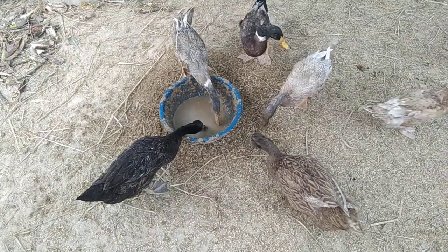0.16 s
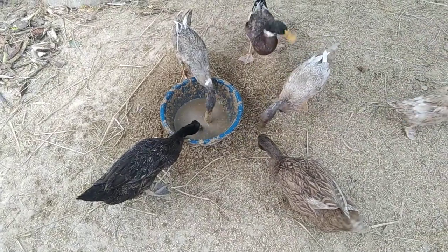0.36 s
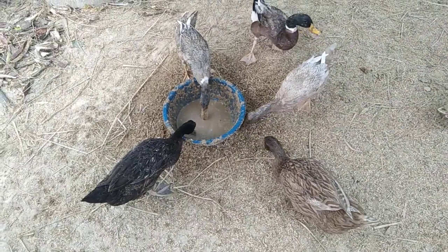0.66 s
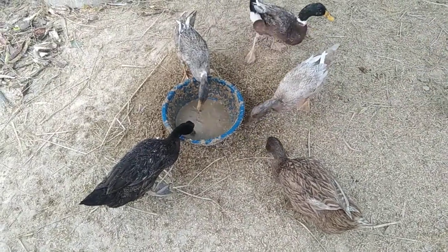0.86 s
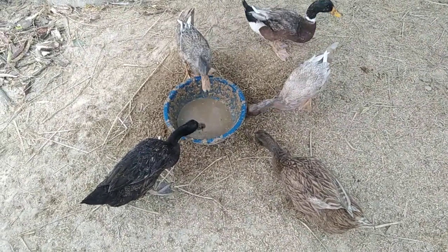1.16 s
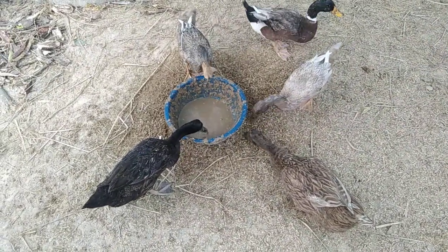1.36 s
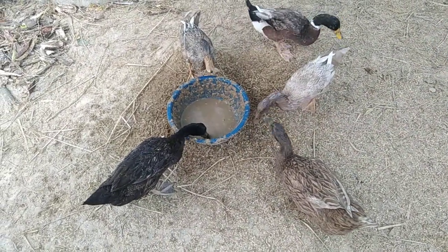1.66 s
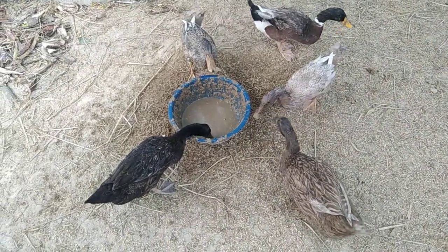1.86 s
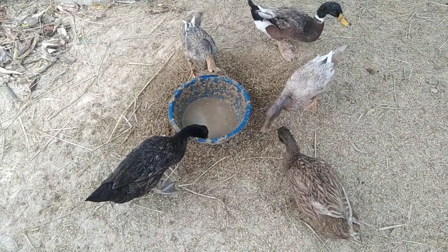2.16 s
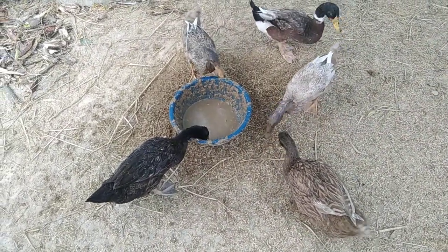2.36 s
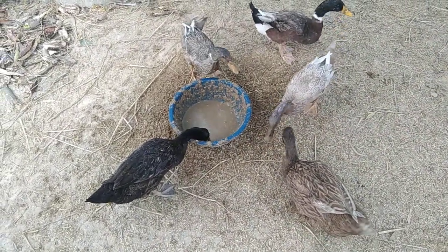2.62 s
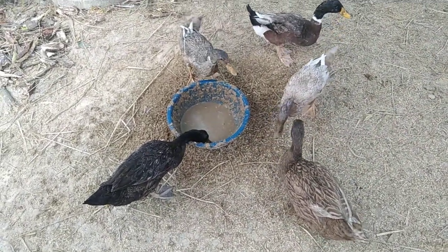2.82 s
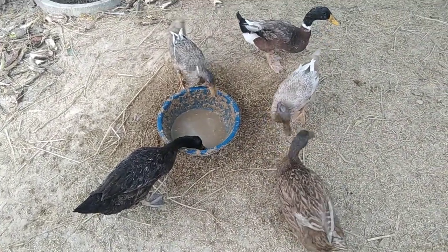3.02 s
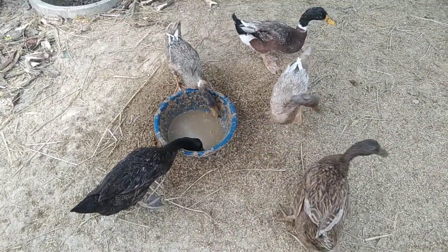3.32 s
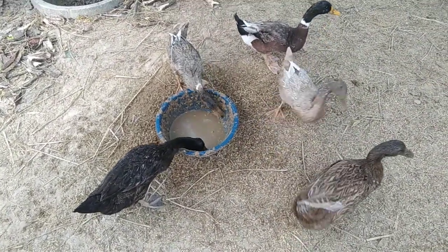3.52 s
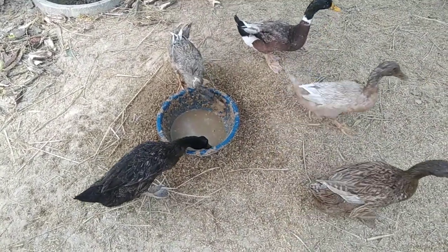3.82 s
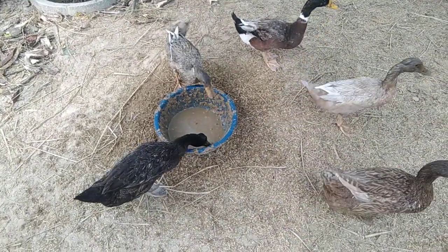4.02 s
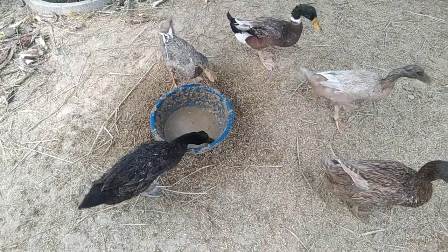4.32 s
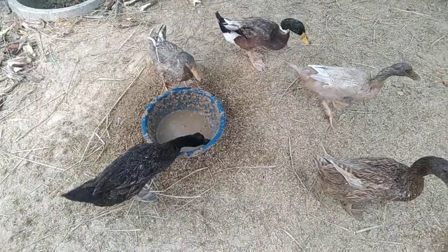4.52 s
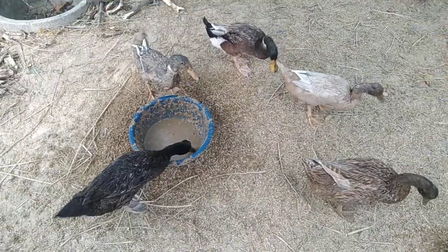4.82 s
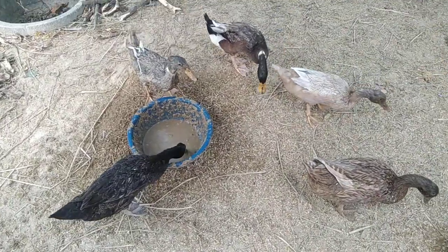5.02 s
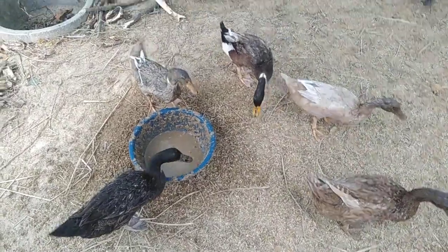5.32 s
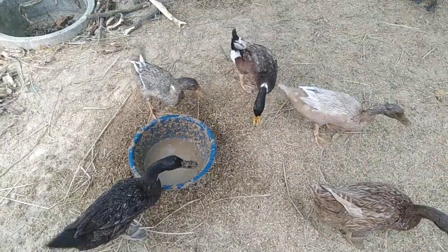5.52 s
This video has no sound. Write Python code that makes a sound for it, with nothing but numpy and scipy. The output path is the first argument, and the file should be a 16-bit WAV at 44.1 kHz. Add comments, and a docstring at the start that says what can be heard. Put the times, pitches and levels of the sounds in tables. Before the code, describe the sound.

Ducks dabble and click their bills in muddy water, giving short quacks, one longer quack and a buzzing chuckle, until a heavy bang startles the yard.

```python
"""Ducks feed at a bowl in a farmyard below a phone: thuds (gusts and hollow puffs that go with quacks) are filtered
noise; bills dabble and click as noise and rising bubbles. Short quacks, then a long one at 0.55 s, are pulse trains
through throat and mouth resonances; a buzzing chuckle follows at 0.9 s. A far moan and far fowl are sums of partials.
At 2.9 s something heavy bangs in close blows of decaying noise, rumbles away and rattles.
The phone's noise suppressor leaves the background in patches."""
import sys
import numpy as np
from scipy import signal
from scipy.fft import rfft, irfft, next_fast_len
from scipy.io import wavfile
from scipy.ndimage import uniform_filter1d, minimum_filter1d, map_coordinates

SR = 44100
rng = np.random.default_rng(int(sys.argv[2]) if len(sys.argv) > 2 else 0)


def generate_wav(sig):
    """Save sig (samples, or channels by samples) to the path in sys.argv[1] as 16-bit PCM at SR."""
    pcm = np.round(np.clip(np.atleast_2d(sig).T, -1, 1) * 32767).astype(np.int16)
    wavfile.write(sys.argv[1], SR, pcm)


N = 250190

# Thuds: gusts on the phone, and hollow puffs that go with quacks:
# [start t/s, length t/s, deep level/dB, hollow level/dB], before the thud envelope
THUD_EVENTS = [(0, 0.11, -77, -58.5), (0.124, 0.35, -82, -57.5), (0.229, 0.094, -78, -52.5),
               (0.327, 0.19, -76, -60.5), (0.444, 0.11, -84, -60), (0.566, 0.48, -61.5, -47.5),
               (1.092, 0.22, -90, -49.5), (1.35, .08, -73, -80), (1.67, 0.21, -67, -64),
               (1.889, 0.33, -77, -54.5), (2.088, 0.14, -70.5, -62.5), (2.199, 0.16, -67, -56),
               (3.115, 0.42, -46, -45.5), (3.394, 0.26, -57, -58.5), (3.803, 0.16, -60, -57),
               (4.211, 0.2, -70, -59), (4.421, 0.17, -74, -60.5), (4.573, 0.18, -68, -73),
               (4.821, 0.28, -50.5, -56), (4.994, .27, -52, -56.5), (5.38, 0.14, -83, -70),
               (5.596, 0.18, -81.5, -70.5)]
# Thud envelope: [share of the length, level/dB]
THUD_ENVELOPE = [(0, -11), (.1, -1), (.6, -8), (1, -21)]
# Spectra of deep rumble and of hollow thud (also the chest puff): [f/Hz, level/dB]
DEEP_SPECTRUM = [(29, -40.5), (50, -6.5), (97, -0.5), (134, -1.5), (260, -6.5), (340, -28), (570, -120)]
HOLLOW_SPECTRUM = [(130, -30), (220, -4.5), (448, -9), (566, -15.5), (700, -32), (910, -60.5), (1540, -120)]
BREEZE_DB = -80  # steady deep rumble under the thuds

# Level courses of far flock and dabbling, in successive segments: [t/s, level/dB]
FLOCK_COURSE = [
    [(0.0, -54), (0.13, -70), (0.298, -57.5), (0.55, -102.5)],
    [(0.9, -48.5), (1.042, -63), (1.372, -71), (1.518, -88), (1.726, -66), (1.862, -55), (1.9, -59)],
    [(1.9, -46), (1.966, -48.5), (2.266, -54), (2.404, -76), (2.654, -66), (2.82, -52.5), (2.89, -51)],
    [(3.2, -44.5), (3.44, -47.5), (3.62, -55.5), (3.854, -59.5), (4.068, -58), (4.286, -57.5), (4.4, -60)],
    [(4.4, -67), (4.48, -58), (4.628, -52.5), (4.802, -59), (4.94, -66), (5.45, -77.5), (5.67, -90.5)],
]
DABBLE_COURSE = [
    [(0.0, -58.5), (0.5, -60.5), (0.55, -53.5)],
    [(0.9, -45.5), (1.008, -47.5), (1.238, -54), (1.364, -53), (1.526, -62.5), (1.716, -62), (1.9, -54)],
    [(1.9, -56), (2.288, -50.5), (2.494, -56.5), (2.604, -59), (2.762, -55.5), (2.89, -47.5)],
    [(3.2, -55.5), (3.44, -52), (3.596, -68.5), (3.844, -75), (3.974, -62), (4.044, -58), (4.4, -63)],
    [(4.4, -60), (4.658, -55.5), (4.782, -60), (4.934, -66), (5.156, -71), (5.302, -68), (5.67, -60.5)],
]
# Puffs of spray: [crest t/s, level/dB]
SPRAY_PUFFS = [(0.388, -79), (.96, -58.5), (1.1, -63.5), (2.05, -84), (2.214, -63), (2.519, -78),
               (2.78, -82.5), (3.35, -89), (3.52, -73.5), (3.84, -70.5), (4.131, -67.5), (4.47, -63.5),
               (4.58, -67.5), (5.6, -87)]
# Spectra of flock, dabbling, spray, and a low hum with a little hiss: [f/Hz, level/dB]
FLOCK_SPECTRUM = [(410, -67), (700, -24.5), (914, -1), (1090, -1.5), (1210, 0), (1540, -0.5), (2130, -8),
                  (2500, -9), (3250, -23.5), (5500, -120)]
DABBLE_SPECTRUM = [(1350, -32), (2300, -7), (3500, -5.5), (5380, -10), (5660, -11), (6150, -17),
                   (7070, -37), (7500, -24.5), (9750, -46), (16500, -120)]
SPRAY_SPECTRUM = [(4120, -32.5), (7000, 0.5), (8380, 8.5), (9180, -1), (13300, 0.5), (15600, -4)]
HUM_SPECTRUM = [(12, -45), (20, -18), (81, 23.5), (650, -19), (960, -6), (3560, -22.5), (5400, 9),
                (7130, -34.5), (15600, -50)]
SPRAY_DB, HUM_DB = -26.5, -99.5  # spray relative to the dabbling; hum rms
PUFF_RISE_S, PUFF_FALL_S = 0.02, 0.045

# Bill clicks and slurps: [t/s, overall level/dB, bubble start f/Hz, then relative levels/dB of
# knock, spray and bubble]; knock and spray are weighted again in bills()
BILL_CLICKS = [(0.0354, -58.5, 2050, 21.5, -13, -6), (0.0918, -50, 3540, 8.5, -49, 15.5),
               (0.1517, -40, 3450, -28, -26, -15), (0.452, -60, 2770, 10, -57, -19),
               (0.4768, -55, 4800, -28, -48, 7), (0.5184, -54.5, 2220, 17, -5, 12.5),
               (0.9629, -39, 3280, 9.5, -7, 0), (1.584, -56.5, 5070, -43, -51, 10.5),
               (1.6948, -34.5, 3260, -1, -23.5, -0.5), (1.862, -48.5, 2280, -27, -8.5, -14),
               (2.081, -37, 3550, 6.5, -28, -14), (2.1216, -43, 2160, 2, -33, 4.5),
               (2.174, -31, 3300, -13, -41, -28), (2.3157, -40, 2020, 0, -27, -4),
               (2.3394, -29, 2106, -17, -52, -15), (2.394, -42, 4030, 3.5, -39, -2.5),
               (2.4184, -42.5, 2600, 1, -26, -1), (2.4678, -33.5, 3630, -56, -14.5, -4.5),
               (2.5634, -42, 4070, 1.5, -54, 1.5), (2.597, -42.5, 2480, -14.5, -27, -5),
               (2.6572, -40.5, 3970, -26.5, -15, -3), (2.7186, -44.5, 3740, -13.5, -31, 9),
               (2.8429, -61.5, 3490, -19, -48.5, -20.5), (3.4357, -47, 2047, 11, -40, 2),
               (3.7948, -41, 2410, -28, -20.5, -17.5), (3.9103, -35.5, 2980, -17.5, -28, -12),
               (3.9577, -39, 2900, 1, -36.5, -11), (4.1802, -43, 2900, -13, -15, -28.5),
               (4.2892, -43.5, 2030, 6.5, -15, -27), (4.451, -33.5, 3900, 2, -17, -5),
               (4.4859, -28, 3330, -8.5, -22.5, -10), (4.5434, -45, 4840, 10, -31, 1.5),
               (4.8235, -43.5, 3300, 6, -41, -9)]

# Short quacks: [start t/s, length t/s, crest as share of length, crest level/dB, first f/Hz, last f/Hz,
# fundamental level/dB and rasp level/dB relative to the voice, mouth resonance f/Hz]
SHORT_QUACKS = [(.168, 0.061, 0.37, -47.5, 223, 214.7, 2.5, -9, 972),
                (0.233, 0.072, 0.38, -43.5, 248.4, 283, -6, -13.5, 1380),
                (1.67, 0.052, 0.38, -42.5, 273, 262.4, -9.5, -32, 1380),
                (2.012, 0.051, 0.43, -36.5, 292.7, 264.7, -13, -14, 1350),
                (2.231, 0.05, .45, -43.5, 300, 304, -6, -28, 1170),
                (3.393, 0.067, 0.57, -42, 186, 184, -12, -12, 1380),
                (3.537, .055, 0.38, -36, 227.4, 255.3, -12, -15.5, 1323),
                (3.811, .09, 0.3, -33.5, 222.8, 270.5, -17.5, -10, 1355),
                (4.209, 0.076, 0.4, -34, 289.7, 257, -14.5, -13.5, 1353),
                (4.423, 0.061, 0.72, -44, 200.1, 191.2, -19, -12, 1290),
                (4.578, 0.038, 0.53, -44, 305, 283, -11.5, 1.5, 1250),
                (4.697, 0.078, .6, -35.5, 217.9, 212.6, -11, -2, 1330),
                (5.576, 0.074, 0.7, -54, 238.7, 237.7, -40, 0, 1450)]
# Spectra of the short quacks' voice and rasp: [f/Hz, level/dB]
SHORT_THROAT_SPECTRUM = [(260, -74), (450, -20), (736, -0.5), (1350, 2), (1700, 4), (2020, 8), (2300, -51),
                         (2990, -29), (5060, -120)]
RASP_SPECTRUM = [(1240, -27.5), (2100, -10), (3810, -17.5), (4410, -21.5), (4990, -18.5), (7060, -33),
                 (11000, -83), (14300, -112), (22000, -120)]
ONSET_SHARE, START_DB, ONSET_DB, END_DB = 0.079, -12.5, -9.5, -21.5  # short rise, climb to crest, fall
BILL_CLOSES, CHEST_DB = 0.048, -18  # fall of mouth resonance as a share; hollow puff from the chest
# Long quack: [t/s, pitch f/Hz, level/dB, mouth resonance f/Hz, weakening of every other pulse 0-1]
LONG_QUACK = [(0.545, 280, -50, 860, 0.4), (0.566, 266, -44, 880, 0.7), (0.59, 249.7, -45, 910, 1),
              (0.625, 276.1, -52, 1030, .8), (0.656, 236.2, -32.5, 1280, .7), (0.72, 251.4, -29, 1710, 0),
              (0.77, 259.7, -29.5, 1680, 0.7), (0.8, 252, -29.5, 1690, 0.8), (0.85, 232.1, -32, 1660, 0.7),
              (0.866, 260, -55, 1630, .5), (0.9, 259.1, -79, 1600, .4)]
# Throat spectrum of the long quack: [f/Hz, level/dB]
LONG_THROAT_SPECTRUM = [(180, -43), (300, -8), (482, 0.5), (738, 0), (869, 8.5), (1700, 3), (2100, 2.5),
                        (2440, 3.5), (3610, -9), (4320, -4), (5260, -6), (7670, -24), (15000, -38.5)]
LONG_LOW_DB = -16.5  # mean level of the fundamental relative to the voice

# Short single tones; the second is the rising tone that opens the long quack, the others are short whistles:
# [start t/s, length t/s, first f/Hz, last f/Hz, level/dB before the call envelope]
SINGLE_TONES = [(.51, 0.16, 1785, 1740, -57.5), (.548, .07, 820, 1078, -49.5), (2.64, 0.09, 895, 1250, -56),
                (2.718, 0.084, 937, 870, -55), (3.94, 0.071, 1540, 1640, -56.5)]
# Falling tones that end two loud short quacks: columns as the single tones
GULP_TONES = [(3.864, 0.0275, 1145, 760, -50), (4.269, .026, 1418, 798, -43.5)]
# Far hen, honk, duck's whine, hoarse croaks, and a wheezy far chuckle, perhaps the drake: columns as above
HEN_CALLS = [(1.8, 0.1, 555, 564, -46.5), (1.885, 0.083, 544, 590, -55.5), (5.08, 0.046, 484, 480, -66.5)]
HONKS = [(2.7, 0.43, 572.7, 622, -53.5)]
WHINES = [(4.02, 0.1, 298, 243.7, -56.5), (4.105, 0.13, 261.5, 253.6, -56)]
CROAKS = [(4.625, 0.058, 200, 197.6, -54), (4.885, 0.093, 195.3, 202.5, -54.5)]
FAR_CHUCKLES = [(5.115, 0.495, 457, 455, -60)]
# Partials of each far call: [multiple of the pitch, relative level/dB]
HEN_PARTIALS = [(1, -12), (2, 11), (3, 15), (4, 7.5), (5, 0), (6, -20), (7, 1), (8, 1.5)]
HONK_PARTIALS = [(2, 0), (3, -3), (4, -2), (5, -10), (6, -8), (7, -10)]
WHINE_PARTIALS = [(4, -4), (5, -2), (6, 0), (7, -6), (10, -8), (11, -8)]
CROAK_PARTIALS = [(10, -10), (11, -4), (12, 0), (13, 0), (14, 0), (15, -2), (16, -6), (17, -12)]
FAR_CHUCKLE_PARTIALS = [(1, -18), (2, -14.5), (3, -21), (4, -9.5), (5, -7), (6, -1.5), (7, 3), (8, -4),
                        (9, -4), (10, -7), (11, -14.5)]
# Envelope shared by the tones and far calls: [share of the length, level/dB]
CALL_ENVELOPE = [(0, -6), (.15, 4.5), (.85, -1.5), (1, -32.5)]
CALL_ARCH = 0.012  # lift midway through a call, as a share of its first pitch
# Low moan far off: [t/s, pitch f/Hz, second partial level/dB, third partial level/dB]
MOAN_COURSE = [(1.7, 167.7, -70, -82), (1.78, 197.6, -66.5, -69), (1.95, 202.2, -61.5, -60.5),
               (2.09, 217, -65.5, -58.5), (2.15, 198.4, -89, -56.5), (2.2, 177, -90, -67)]

# Feeding chuckle, one row a syllable: [crest t/s, crest level/dB, crest pitch f/Hz]
CHUCKLE_CRESTS = [(0.939, -41, 487.3), (1.019, -41.5, 486.2), (1.107, -41, 475.2), (1.196, -43.5, 467),
                  (1.277, -46, 473.6), (1.365, -47, 444.7), (1.462, -52, 424)]
# Throat spectrum of the chuckle: [f/Hz, level/dB]
CHUCKLE_SPECTRUM = [(710, -29), (1200, -7), (1830, 1.5), (2620, 1), (2980, 1), (3270, -1.5), (4310, 5),
                    (5920, 0), (7160, -11.5), (10700, -33.5), (15000, -36)]
CHUCKLE_START_S, CHUCKLE_END_S = 0.89, 1.63
SWELL_DB_PER_S, DROP_DB_PER_S, TRAIL_DB_PER_S = 151, 447.5, 120.5  # slow swell, fast drop, last decay
EFFORT_HZ_PER_DB = 4  # pitch rises with effort towards each crest

# Blows of the bang: [t/s, nominal level/dB before a 14 dB cut]
BANG_BLOWS = [(2.911, -10.5), (2.954, -9), (2.967, -13)]
# Spectrum of the bang: [f/Hz, level/dB]
BANG_SPECTRUM = [(29, -57.5), (50, -32.5), (98, -7), (195, -2), (230, -4), (408, -7.5), (483, -11),
                 (778, -14), (856, -15), (987, -17), (1590, -18.5), (2500, -22.5), (15000, -65)]
# Reverberation times of the bang: [f/Hz, t60 t/s]
BANG_DECAYS = [(60, 1.3), (170, 0.29), (500, 0.83), (1500, 0.62), (4000, 0.24), (10000, 0.78)]
# Loose parts rattling after the blows: [t/s, level/dB, t60 t/s]
RATTLE_PUFFS = [(2.963, -32, 0.5), (3.022, -26.5, 0.08), (3.087, -45.5, 0.06), (3.128, -58.5, 0.22)]
# Spectrum of the rattle: [f/Hz, level/dB]
RATTLE_SPECTRUM = [(880, -28), (1500, -20), (2550, -0.5), (2920, -4), (4680, -13), (15000, -52)]

ECHO_DECAYS = [(300, 0.27), (2000, 0.21), (8000, 0.079)]  # echo of the near ducks: [f/Hz, t60 t/s]
TOP_HZ = 15730  # band limit of the phone


def amp(db):
    """Amplitude ratio: 20 dB are a factor of ten."""
    return 10 ** (np.asarray(db) / 20)


def unit(x):
    """Normalisation to an rms of 1."""
    return x / np.sqrt(np.mean(x ** 2) + 1e-20)


def along(points, hz):
    """Interpolation of (f/Hz, value) points on a logarithmic frequency axis."""
    f, v = np.transpose(points)
    return np.interp(np.log(hz + 1), np.log(f + 1), v)


def filtered(x, response):
    """Linear filtering: the spectrum is multiplied by a response of frequency."""
    m = next_fast_len(x.shape[-1] + 8192)
    spectrum = rfft(x, m) * response(np.fft.rfftfreq(m, 1 / SR))
    return irfft(spectrum, m)[..., :x.shape[-1]]


def colour(x, spectrum):
    """Spectral shaping by (f/Hz, level/dB) points, to rms 1."""
    return unit(filtered(x, lambda hz: amp(along(spectrum, hz))))


def span(rows):
    """Piecewise linear courses: start sample, a fade at both ends, one value per sample for each column."""
    s, *cols = np.transpose(rows)
    t = np.arange(round(s[0] * SR), min(N, round(s[-1] * SR))) / SR
    fade = np.clip(np.minimum(t - t[0], t[-1] - t) / 0.0013, 0, 1)
    return round(s[0] * SR), fade, [np.interp(t, s, c) for c in cols]


def call(start, length, shape):
    """Envelope over relative time: start sample, progress 0-1 and gain."""
    u = np.linspace(0, 1, round(length * SR))
    edge = np.clip(np.minimum(u, 1 - u) * length / 0.004, 0, 1)
    return round(start * SR), u, edge * amp(np.interp(u, *np.transpose(shape)))


def levels(tables):
    """Level courses linear in dB, as one gain per sample for each column."""
    s, *cols = np.concatenate(tables).T
    return [amp(np.interp(np.arange(N) / SR, s, db)) for db in cols]


def add(out, start, x):
    """Superposition: x is mixed into out."""
    out[start:start + len(x)] += x[:len(out) - start]


def wobble(n, rate):
    """Slow random modulation: a smooth curve with rate random knots a second."""
    knots = rng.standard_normal(int(n * rate / SR) + 4)
    return map_coordinates(knots, [np.arange(n) * rate / SR])


def patches(spectrum, patchy_db, grains, width, length):
    """Random modulation in time and frequency: noise with spiky grains and patches of random gain."""
    x = rng.standard_normal(N) * amp(grains * wobble(N, 300))
    z = signal.stft(x, nperseg=512)[2]
    field = uniform_filter1d(rng.standard_normal(z.shape), size=width, axis=0)
    field = uniform_filter1d(field, size=length, axis=1)
    patchy = signal.istft(z * amp(patchy_db * unit(field)), nperseg=512)[1][:N]
    return colour(patchy, spectrum)


def tail(decays, length):
    """Reverberant decay: noise whose every frequency dies at its own speed."""
    hz, t, z = signal.stft(rng.standard_normal(int(length * SR)), SR, nperseg=256)
    return signal.istft(z * amp(-60 * t / along(decays, hz)[:, None]), SR, nperseg=256)[1]


def syrinx(hz, rough, sub, jitter):
    """Pulsed voice source: alternately strong and weak pulses, with noise gated once a cycle."""
    n = len(hz)
    phase = 2 * np.pi * np.cumsum(hz * (1 + jitter * wobble(n, 151.4))) / SR
    k = np.arange(1, int(15000 / hz.max()))[:, None]
    pulses = np.cos(k * phase - 0.3 * k ** 2).sum(0)  # equal harmonics, the higher the later
    alternation = 1 + sub * np.cos(phase / 2)
    pulses = unit(pulses * alternation * amp(1.5 * wobble(n, 120)))
    breath = unit((1 + np.cos(phase)) ** 2 * rng.standard_normal(n))
    return phase, np.sqrt(1 - rough) * pulses + np.sqrt(rough) * breath


def mouth(x, centre_hz, width_hz, lift_db):
    """Moving resonance: a peak in the response follows the opening of the bill."""
    hz, t, z = signal.stft(x, SR, nperseg=256, noverlap=224)
    centre = np.interp(t * SR, np.arange(len(x)), centre_hz)
    gain = amp(lift_db / (1 + ((hz[:, None] - centre) / width_hz) ** 2))
    gain = gain / np.linalg.norm(gain[:16], axis=0)  # offsets the overall lift as the peak moves
    return unit(signal.istft(z * gain, SR, nperseg=256, noverlap=224)[1][:len(x)])


def thuds():
    """Low-frequency noise bursts: each thud lands quickly and dies away as a deep and a hollow rumble."""
    deep, hollow = np.full(N, amp(BREEZE_DB)), np.zeros(N)
    for s, length, deep_db, hollow_db in THUD_EVENTS:
        start, _, gain = call(s, length, THUD_ENVELOPE)
        add(deep, start, amp(deep_db) * gain)
        add(hollow, start, amp(hollow_db) * gain)
    rumble = deep * patches(DEEP_SPECTRUM, 3, 2, width=1, length=8)
    return rumble + hollow * patches(HOLLOW_SPECTRUM, 3, 2, width=1, length=8)


def yard():
    """Small sources merge into noise: far flock, bills sieving mud, spray, a faint steady low hum with a little hiss."""
    (flock,), (dabble,) = levels(FLOCK_COURSE), levels(DABBLE_COURSE)
    t = np.arange(N) / SR
    spray = amp(SPRAY_DB) * dabble
    for s, db in SPRAY_PUFFS:
        width = np.where(t < s, PUFF_RISE_S, PUFF_FALL_S)
        spray = spray + amp(db) * np.exp(-((t - s) / width) ** 2)
    voices = flock * amp(1.5 * wobble(N, 14)) * patches(FLOCK_SPECTRUM, 3, 1.5, width=2, length=14)
    mud = dabble * amp(2 * wobble(N, 22)) * patches(DABBLE_SPECTRUM, 3.5, 2.5, width=3, length=12)
    mist = spray * amp(2.5 * wobble(N, 25)) * patches(SPRAY_SPECTRUM, 4, 2.5, width=3, length=10)
    hum = amp(HUM_DB) * colour(rng.standard_normal(N), HUM_SPECTRUM)
    return voices + mud + mist + hum


def bills():
    """Bubble resonance and turbulence: a rising bubble, a wet splash, a dull knock and a puff of spray."""
    out, t = np.zeros(N), np.arange(SR // 5) / SR

    def band(lo, hi):
        """Band-limited noise between two cutoff frequencies."""
        noise = rng.standard_normal(len(t))
        return unit(filtered(noise, lambda f: 1 / (1 + (lo / (f + 1)) ** 8) / (1 + (f / hi) ** 8)))

    rise = 1 - np.exp(-t / 0.001)
    decay = amp(-60 * t / 0.11) + 0.7 * amp(-60 * t / 0.018)
    for s, db, hz, knock_db, spray_db, bubble_db in BILL_CLICKS:
        bubble = amp(bubble_db - 60 * t / 0.04) * np.sin(2 * np.pi * hz * t * (1 + 3 * t))
        splash = band(hz / 1.5, 1.69 * hz)
        knock = amp(knock_db) * band(850, 2000)
        spray = 2.74 * amp(spray_db) * band(5200, 10000)
        add(out, round(s * SR), amp(db) * rise * (bubble + 0.21 * (splash + knock + spray) * decay))
    return out


def short_quacks():
    """Source and filter: pulses through throat and mouth, with fundamental, rasp and chest puff."""
    out = np.zeros(N)
    for s, length, crest, db, first_hz, last_hz, low_db, rasp_db, mouth_hz in SHORT_QUACKS:
        shape = [(0, START_DB), (ONSET_SHARE, ONSET_DB), (crest, 0), (1, END_DB)]
        start, u, gain = call(s, length, shape)
        pitch = first_hz + (last_hz - first_hz) * u
        breaking = np.clip(np.linspace(0, 1.8, len(u)), 0, 0.8)  # every other pulse weakens progressively
        phase, voice = syrinx(pitch, rough=0.12, sub=breaking, jitter=0.02)
        closing_hz = mouth_hz * (1 - BILL_CLOSES * u ** 4)
        voice = mouth(colour(voice, SHORT_THROAT_SPECTRUM), closing_hz, width_hz=770, lift_db=47.0)
        low = amp(low_db) * np.cos(phase)
        rasp = colour(syrinx(pitch, rough=0.6, sub=breaking, jitter=0.02)[1], RASP_SPECTRUM)
        chest = colour(rng.standard_normal(len(u)), HOLLOW_SPECTRUM)
        add(out, start, gain * amp(db) * (voice + low + amp(rasp_db) * rasp + amp(CHEST_DB) * chest))
    return out


def tones_and_far_calls():
    """Sums of harmonics fluttering in strength: single tones (whistles, quack onset, gulps) and distant calls."""
    out = np.zeros(N)
    sources = [  # calls, partials, flutter of each partial in dB
        (SINGLE_TONES + GULP_TONES, [(1, 0)], 3.5),
        (HEN_CALLS, HEN_PARTIALS, 3.5),
        (HONKS, HONK_PARTIALS, 5),
        (WHINES, WHINE_PARTIALS, 4),
        (CROAKS, CROAK_PARTIALS, 7),
        (FAR_CHUCKLES, FAR_CHUCKLE_PARTIALS, 4.5),
    ]
    for rows, partials, flutter_db in sources:
        for s, length, first_hz, last_hz, db in rows:
            start, u, gain = call(s, length, CALL_ENVELOPE)
            hz = first_hz + (last_hz - first_hz) * u + CALL_ARCH * first_hz * np.sin(np.pi * u)
            jitter = 0.011 * wobble(len(u), 200) + 0.007 * wobble(len(u), 30)
            phase = 2 * np.pi * np.cumsum(hz * (1 + jitter)) / SR
            tone = sum(amp(g + flutter_db * wobble(len(u), 110)) * np.sin(k * phase) for k, g in partials)
            add(out, start, gain * amp(db) * unit(tone))
    return out


def long_quack():
    """Source and filter: pulses through throat and moving mouth resonance, over a soft fundamental."""
    out = np.zeros(N)
    start, fade, (hz, db, mouth_hz, sub) = span(LONG_QUACK)
    phase, voice = syrinx(hz, rough=0.26, sub=np.clip(sub, 0, 1), jitter=0.013)
    voice = mouth(colour(voice, LONG_THROAT_SPECTRUM), mouth_hz, width_hz=300, lift_db=13)
    low = amp(LONG_LOW_DB + 1.8 * wobble(len(hz), 36)) * np.cos(phase)
    add(out, start, fade * amp(db) * (voice + low))
    return out


def chuckle():
    """Amplitude modulation: a bright buzz swells slowly and drops fast in quick syllables."""
    t = np.arange(round(CHUCKLE_START_S * SR), round(CHUCKLE_END_S * SR)) / SR
    s, crest_db, crest_hz = np.transpose(CHUCKLE_CRESTS)[..., None]
    under_db = np.where(t < s, SWELL_DB_PER_S * (s - t), DROP_DB_PER_S * (t - s))
    under_db[-1] = np.where(t < s[-1], under_db[-1], TRAIL_DB_PER_S * (t - s[-1]))  # the last trails off
    hz = np.interp(t, s[:, 0], crest_hz[:, 0]) - EFFORT_HZ_PER_DB * under_db.min(0)
    voice = syrinx(hz, rough=0.38, sub=0, jitter=0.01)[1]
    fade = np.clip(np.minimum(t - t[0], t[-1] - t) / 0.06, 0, 1)
    gain = fade * amp((crest_db - under_db).max(0))
    out = np.zeros(N)
    add(out, round(t[0] * SR), gain * colour(voice, CHUCKLE_SPECTRUM))
    return out


def moan():
    """Harmonics without their fundamental: the second and third partials glide together."""
    out = np.zeros(N)
    start, fade, (hz, second_db, third_db) = span(MOAN_COURSE)
    phase = 2 * np.pi * np.cumsum(hz * (1 + 0.012 * wobble(len(hz), 41))) / SR
    second, third = (amp(3 * wobble(len(hz), 35)) * np.sin(k * phase) for k in (2, 3))
    add(out, start, np.sqrt(2) * fade * (amp(second_db) * second + amp(third_db) * third))
    return out


def bang():
    """Impact and reverberation: each blow is a burst that rumbles round the yard, the deepest bass longest."""
    out = np.zeros(N)
    for s, db in BANG_BLOWS:
        rumble = tail(BANG_DECAYS, 2.1)
        t = np.arange(len(rumble)) / SR
        add(out, round(s * SR), amp(db - 14.0) * rumble * (0.75 + amp(-60 * t / 0.42)))
    level = np.sqrt(np.mean(out ** 2))
    rise = np.clip((np.arange(N) / SR - BANG_BLOWS[0][0]) / 0.002, 0, 1) ** 2  # sharp first onset
    return level * rise * colour(out, BANG_SPECTRUM)


def rattle():
    """Exponential decay of loose parts: soft-edged bright puffs of clatter."""
    out, t = np.zeros(N), np.arange(SR // 3) / SR
    for s, db, t60 in RATTLE_PUFFS:
        clatter = colour(rng.standard_normal(len(t)), RATTLE_SPECTRUM)
        add(out, round(s * SR), amp(db - 60 * t / t60) * (1 - np.exp(-t / 0.005)) * clatter)
    return out


def scene():
    """Superposition of all sources, with a short echo by convolution for the near ducks."""
    ducks = bills() + short_quacks() + long_quack() + chuckle()
    echo = tail(ECHO_DECAYS, 0.18)
    wet = amp(-9) * signal.fftconvolve(ducks, echo / np.linalg.norm(echo))[:N]
    return (thuds() + yard() + ducks + wet + tones_and_far_calls() + moan() + bang() + rattle())[None]


def record(dry):
    """Spectral subtraction: what stands little above the quietest level nearby in time is turned down."""
    z = signal.stft(dry, nperseg=1024, noverlap=768)[2]
    power = uniform_filter1d(np.abs(z) ** 2, size=7, axis=-1)
    power = np.abs(uniform_filter1d(power, size=3, axis=-2)) + 1e-20
    quiet = uniform_filter1d(minimum_filter1d(power, size=60, axis=-1), size=30, axis=-1)
    gain = np.clip(1 - amp(3.0) * quiet / power, amp(-8), 1)
    cleaned = signal.istft(z * gain, nperseg=1024, noverlap=768)[1][:, :N]
    return filtered(cleaned, lambda hz: hz < TOP_HZ)


dry = scene()
out = record(dry)
generate_wav(out)
```